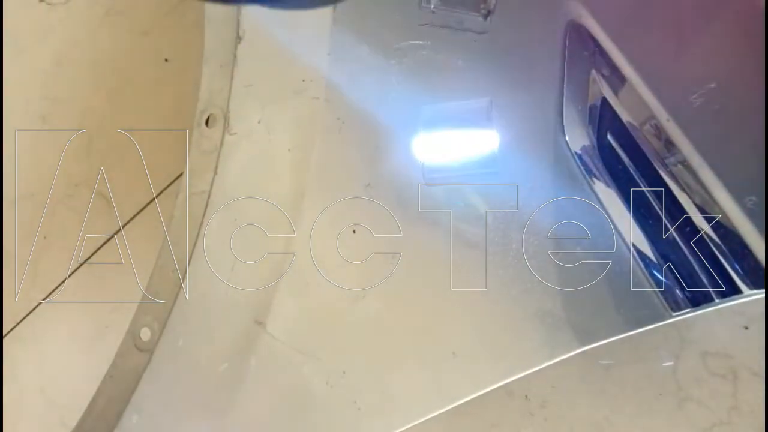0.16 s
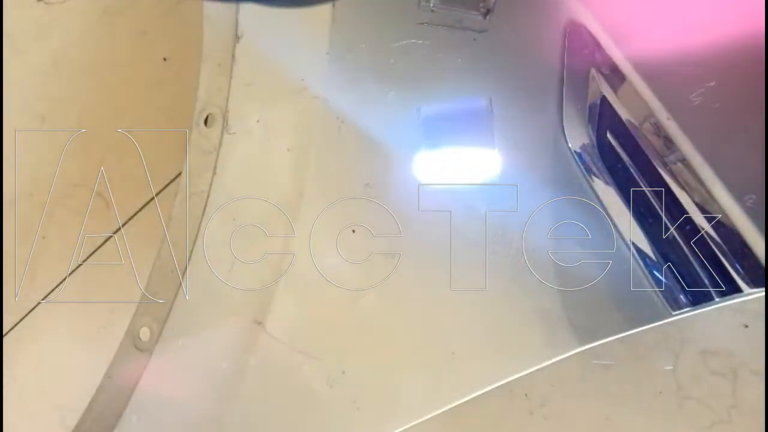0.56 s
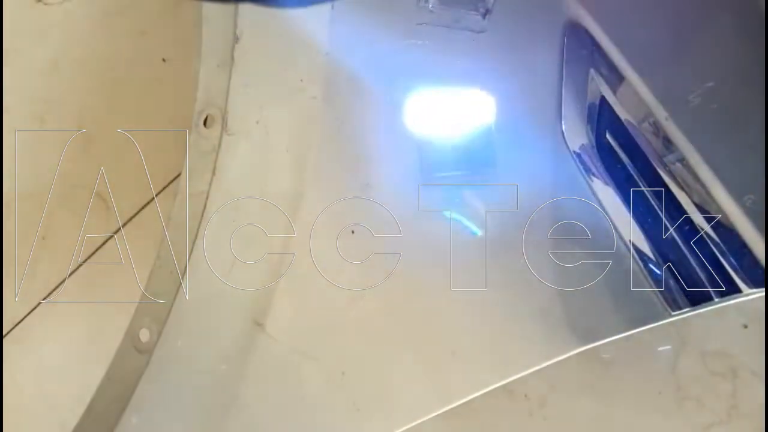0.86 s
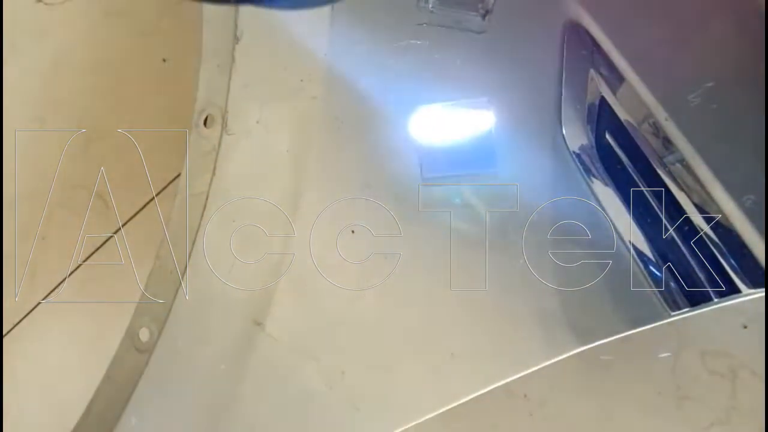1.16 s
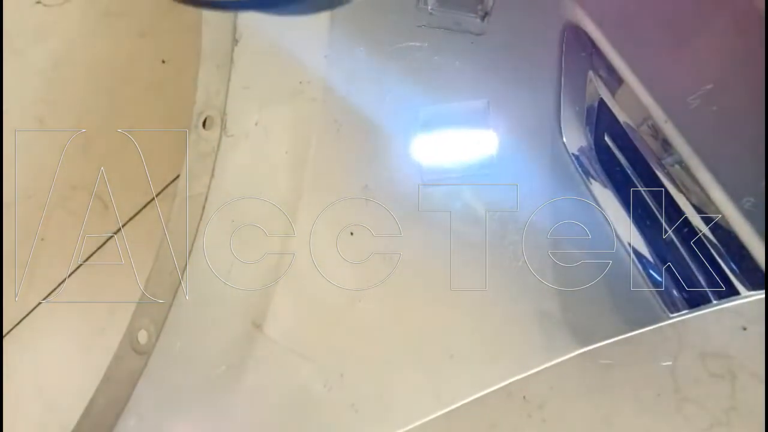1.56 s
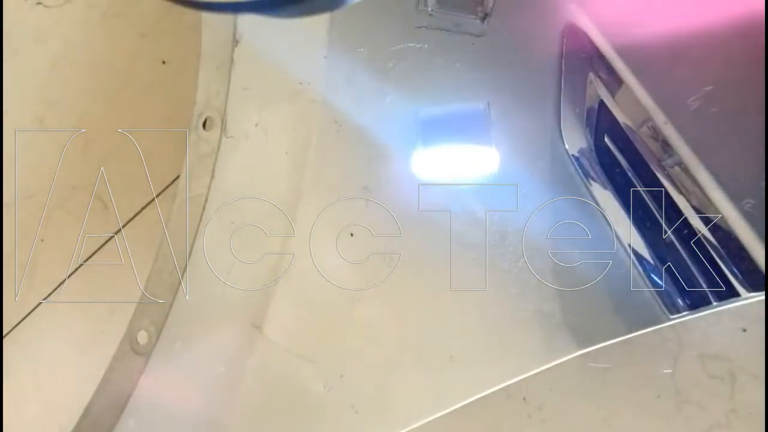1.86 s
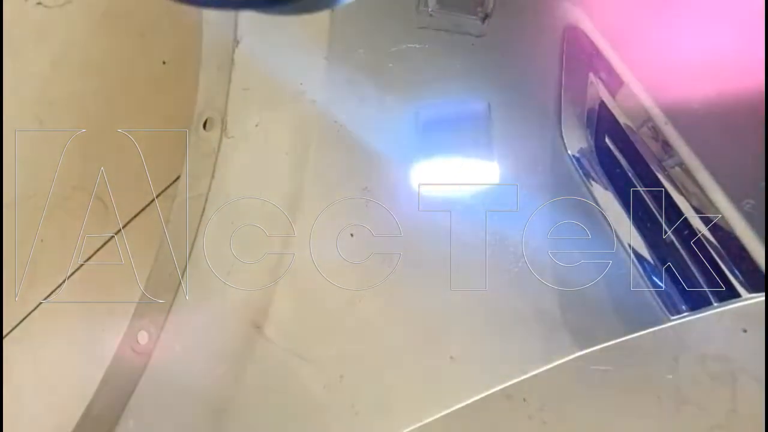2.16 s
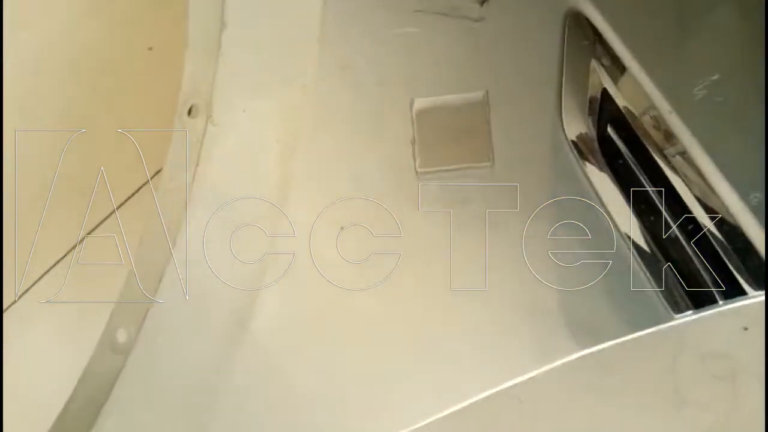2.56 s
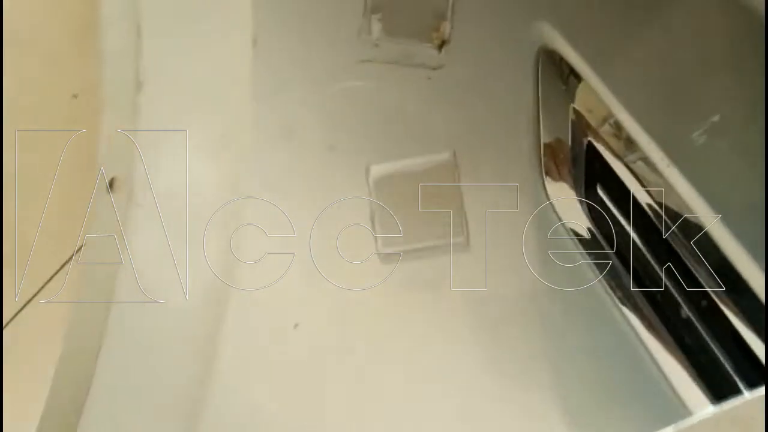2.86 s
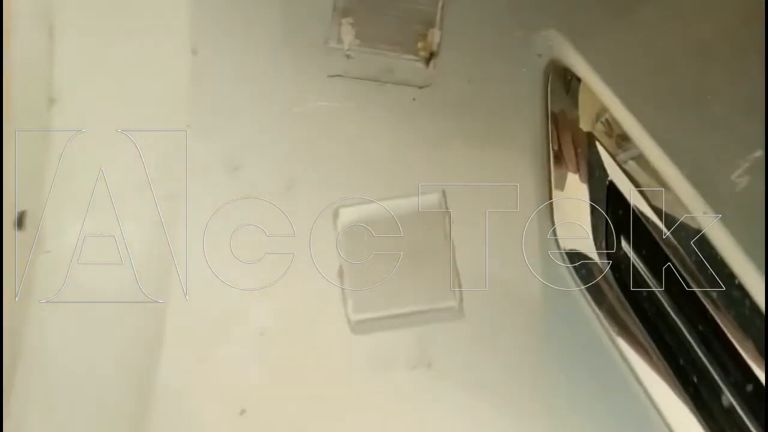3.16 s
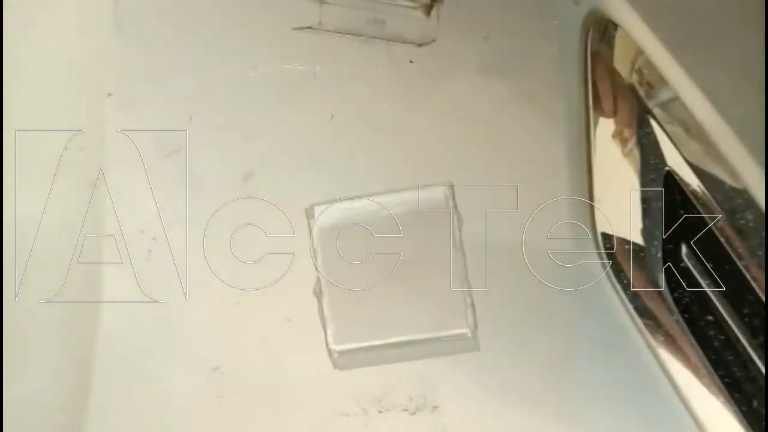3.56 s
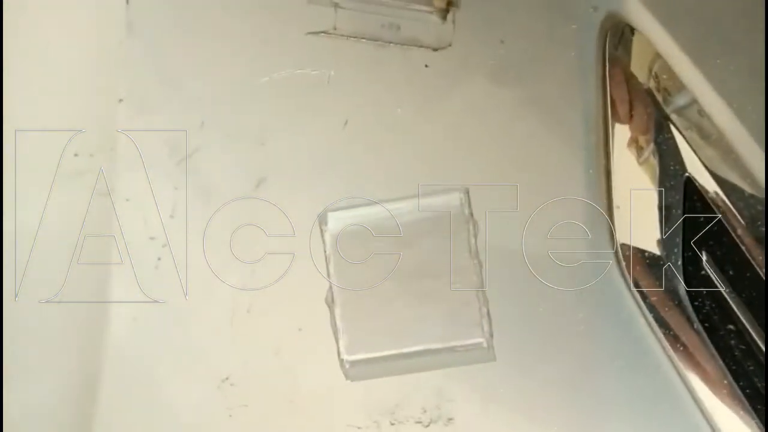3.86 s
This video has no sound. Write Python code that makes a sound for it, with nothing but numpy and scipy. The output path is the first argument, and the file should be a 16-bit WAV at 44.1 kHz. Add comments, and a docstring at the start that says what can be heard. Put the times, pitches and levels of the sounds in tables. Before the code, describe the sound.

A pulsed laser strips paint from sheet metal, heard close in stereo: a harsh, bright buzz of rapid pops, about 111 per second, with gritty sizzle and faint low hum. Its tone shifts unevenly, with two dull thuds near 0.22 s. At about 1.5 s it stops, and the workshop rings out briefly. Quiet fan rumble, hiss and thin whistles remain to 4 s, with a slight hiss swell and tick near 2.3 s.

```python
"""Pulsed laser stripping paint from sheet metal

A pulsed laser sweeps a line over painted sheet metal about 111 times a second, close to a phone.
Each turn of the beam radiates an impulsive pop; burnt paint sizzles as filtered noise in between.
A soft tone sounds at the sweep rate; two dull low thuds fall near where the pops shift by 1 ms.
When the beam stops, decaying noise lets the workshop ring out, leaving the shaped noise of fans:
rumble, thin hiss and narrow whistles, with one tick and a brief swell of hiss."""
import sys
import numpy as np
from scipy import signal
from scipy.fft import rfft, irfft
from scipy.io import wavfile
from scipy.ndimage import uniform_filter1d

SR = 44100
rng = np.random.default_rng(int(sys.argv[2]) if len(sys.argv) > 2 else 0)


def to_wav(s):
    """Save 16-bit WAV."""
    ch = np.atleast_2d(s).T  # columns
    pcm = np.round(np.clip(ch, -1, 1) * 32767)  # PCM
    wavfile.write(sys.argv[1], SR, pcm.astype(np.int16))


N = 176400
T = np.arange(N) / SR  # s
F = np.maximum(np.fft.rfftfreq(N, 1 / SR), 1)  # Hz
SWEEP_HZ = 111.05
STOP_S = 1.5334  # the beam stops


def undb(db):
    """Decibel law: amplitude ratio of a level in dB."""
    return 10 ** (np.asarray(db) / 20)


def unit(x):
    """Normalization to a root-mean-square value of 1."""
    return x / np.sqrt(np.mean(x ** 2))


def over_time(table, column):
    """Linear interpolation of one table column along time."""
    rows = np.array(table, float)
    return np.interp(T, rows[:, 0], rows[:, column])


def over_frequency(table, column):
    """Interpolation of one table column along logarithmic frequency."""
    rows = np.array(table, float)
    return np.interp(np.log(F), np.log(rows[:, 0]), rows[:, column])


def bands(x, edges_hz):
    """Complementary zero-phase filters: bands that add up to the whole sound."""
    lowpasses = [1 / (1 + (F / edge) ** 16) for edge in edges_hz]
    lowpasses = [0 * F] + lowpasses + [0 * F + 1]
    spectrum = rfft(x)
    return [irfft(spectrum * (upper - lower), N) for lower, upper in zip(lowpasses, lowpasses[1:])]


def delay(seconds):
    """Shift theorem: a delay is a phase proportional to frequency."""
    return np.exp(-2j * np.pi * F * seconds)


def causal(db):
    """Minimum-phase principle: folding the cepstrum of a gain curve in dB makes it causal."""
    log_gain = uniform_filter1d(db, size=N // 1000) * np.log(10) / 20
    cepstrum = irfft(log_gain, N)
    cepstrum[1:N // 2] *= 2
    cepstrum[N // 2 + 1:] = 0
    return np.exp(rfft(cepstrum))


def walk(rate_hz):
    """Slow random modulation: random levels held 1 / rate, slewed, at unit rms."""
    hold = int(SR / rate_hz)
    steps = np.repeat(rng.standard_normal(N // hold + 1), hold)
    return unit(uniform_filter1d(steps, hold)[:N])


def clicks(times, db):
    """Band-limited interpolation: windowed sinc impulses placed between samples."""
    at = np.asarray(times)[:, None] * SR
    taps = np.floor(at) + np.arange(-8, 9)
    offset = taps - at
    pulses = undb(db)[:, None] * np.sinc(offset) * np.cos(offset * np.pi / 18) ** 2
    out = np.zeros(N)
    np.add.at(out, np.clip(taps, 0, N - 1).astype(int), pulses)
    return out


# Spectrum of the fan noise: f/Hz, level/dB per Hz
FANS = [(20, 1), (60, -3), (81, -7), (293, -11.5), (500, -16.5), (1290, -19), (4670, -34.5), (8180, -33),
        (16000, -46.5)]
# Narrow whistling bands of the fans: f/Hz, Gaussian width/Hz, level over the hiss/dB
WHISTLES = [(58.74, 5, 4), (115, 38, 3), (529, 5.5, 5), (6915, 180, 11.5), (7980, 400, 8), (9680, 150, 9)]
# Fan level in time: t/s, rumble level/dB, middle level/dB (halved in the lower middle), treble level/dB
FAN_LEVEL = [(1.8, 2.5, 1, 5.5), (2.3, 3.5, 3, 3.5), (2.56, 4, 0.5, 0), (2.8, 0.5, -0.5, 2.5),
             (3.2, 2.5, -0.5, 2), (4, -1.5, -1.5, 1.5)]
FAN_SPLITS_HZ = (140, 2800, 6700)  # rumble, lower middle, upper middle, treble
FANS_DB = -56  # rms of the part common to both sides, before the levels in time
FANS_ALIKE_HZ = 700  # left and right are alike below this
RUMBLE_WAVER_DB = 1.5


def fans():
    """Broadband flow noise: wavering rumble, hiss and whistling bands as mid and side noise."""
    db = over_frequency(FANS, 1)
    for hz, width_hz, over_db in WHISTLES:
        db = db + over_db * np.exp(-.5 * ((F - hz) / width_hz) ** 2)
    mid, side = rfft(rng.standard_normal((2, N))) * undb(db)
    side = side * np.sqrt(0.11 + 0.5865 / (1 + (FANS_ALIKE_HZ / F) ** 2))
    scale = undb(FANS_DB) / np.std(irfft(mid, N))
    rumble_db = over_time(FAN_LEVEL, 1) + RUMBLE_WAVER_DB * walk(4.2)
    middle_db, treble_db = over_time(FAN_LEVEL, 2), over_time(FAN_LEVEL, 3)
    gains = undb([rumble_db, middle_db / 2, middle_db, treble_db])
    ears = []
    for sign in (1, -1):
        noise = irfft(mid + sign * side, N)
        ears.append(scale * np.sum(gains * bands(noise, FAN_SPLITS_HZ), axis=0))
    return np.array(ears)


# Spectrum of the swelling hiss: f/Hz, level/dB
SWELL = [(1000, 0), (3000, 2.5), (5000, -4), (8500, 3.5), (11000, -8)]
SWELL_S, SWELL_RISE_S, SWELL_FALL_S = 2.25, 0.13, 0.306  # peak time, Gaussian widths
SWELL_DB = -58  # rms at the peak


def swell():
    """Amplitude modulation: a faint wide hiss under an uneven Gaussian envelope."""
    spectrum = rfft(rng.standard_normal((2, N))) * undb(over_frequency(SWELL, 1)) * (F > 500)
    hiss = unit(irfft(spectrum, N))
    width_s = np.where(T < SWELL_S, SWELL_RISE_S, SWELL_FALL_S)
    return hiss * undb(SWELL_DB) * np.exp(-.5 * ((T - SWELL_S) / width_s) ** 2)


def tick():
    """Impulse excitation: one sharp click, high-passed at 3 kHz."""
    return bands(clicks([2.2865], [-35]), [3000])[1]  # time in s, click level in dB before the filter


HUM_DB, HUM_FADE_DB_PER_S = (-55, -46.5), -2.5  # rms at the start, left and right; fade


def hum():
    """Periodicity: the sweep rate is heard as a soft low sine while the beam is on."""
    on = uniform_filter1d(1. * (T < STOP_S), SR // 50)
    tone = np.sqrt(2) * np.sin(2 * np.pi * SWEEP_HZ * T)
    return undb(HUM_DB)[:, None] * tone * undb(HUM_FADE_DB_PER_S * T) * on


# Two dull low thuds about 9 ms apart, near where the pops shift by 1 ms:
# t/s, peak level before high-pass and panning/dB
THUDS = [(0.2169, -24), (0.2257, -26)]
THUD_WIDTH_S, THUD_PAN_DB = 0.00042, -19.5  # Gaussian width; left relative to right


def thuds():
    """Pressure pulses: short soft negative Gaussian pushes, high-passed at 70 Hz."""
    push = -sum(undb(db) * np.exp(-.5 * ((T - at) / THUD_WIDTH_S) ** 2) for at, db in THUDS)
    return bands(push, [70])[1] * undb([[THUD_PAN_DB / 2], [-THUD_PAN_DB / 2]])


FIRST_POP_S = .0069
OTHER_END = .5  # turn at the other end, as a fraction of the sweep period
SHIFT_AT_S, SHIFT_S = .217, .00102  # the pops come this much later from here on


def turns():
    """Periodic excitation: times of the beam's turns, alternately at the main and the other end."""
    turn = np.arange(int(2 * SWEEP_HZ * N / SR))
    times = FIRST_POP_S + (turn // 2 + OTHER_END * (turn % 2)) / SWEEP_HZ
    times = times + SHIFT_S * (times > SHIFT_AT_S)
    return times[times < STOP_S]


# Beam sound in time: t/s, then level/dB of the thud, low, middle and treble of the pop
# at the main end, of the whole pop at the other end, and of the sizzle
BEAM = [(0, 0.5, 0.5, 3, -8.5, -21, 3), (.11, -4.5, -7.5, 1.5, -3.5, -3.5, 2.5),
        (.16, 8, -5, -9.5, -1.5, -1, 8), (.2, 12, 2, -8, -3.5, 2.5, 1.5), (.222, 14, -2, -15, -27, -7.5, 8),
        (.26, 4, -10, 0.5, -4, -2, 2), (.33, 1, -2.5, -4, -3, -5, 4), (.42, 3.5, -0.5, 1.5, -6, -7, 4.5),
        (.51, -24.5, -2.5, -0.5, 1.5, -50.5, 2.5), (.6, 4, 3.5, -1.5, -3.5, -70, 2),
        (.69, 5.5, 7.5, -6.5, 3, -15, 1.5), (.78, 3, 5, -1.5, -4, -55, 5.5),
        (.85, -8.5, -8, 2, -4.5, -49, 2), (.95, 3.5, -6, 0, -4, -14, 1.5),
        (1.0, -36.5, -6, -6, -5, -8.5, 0), (1.04, -4, -3, 6, -7.5, -38, 0), (1.27, -12, -4, 2, 0, -30, 2),
        (1.41, -6.5, 0, 4, -6, -22, 1.5), (1.5, 6, 3, 1, -4, -34, 3), (1.53, 11.5, -5, -7, -8, 8.5, 5.5)]
# Spectral tilt of the sizzle: f/Hz, level against the pops/dB
SIZZLE_TILT = [(100, 11.5), (650, -1.5), (2300, 2.5), (3400, 1.5), (4500, 7), (5700, 2.5), (6800, 3),
               (9100, 5), (10500, 6)]
SIZZLE_REPEAT = 0.31
SIZZLE_ALIKE, SIZZLE_ALIKE_HZ = 0.76, 5100  # likeness of left and right in the bass; where it halves
SIZZLE_GRAIN_DB, SIZZLE_FLICKER_DB, SIZZLE_SHIFT_DB = 1.5, 1., 2  # unevenness, level and colour shifts
SIZZLE_BANDS_HZ = 700 * 2 ** (np.arange(14) / 3)  # third octaves
FLARE_DB, FLARE_S, FLARE_LAG_S = 4.5, .0004, 0.0009  # flare by each main pop: height, width, lag


def sizzle():
    """Comb-filtered noise: dense uneven sparks, partly repeating each sweep, of shifting colour."""
    grain = undb(SIZZLE_GRAIN_DB * rng.exponential(size=(3, N)))
    both, left, right = rfft(rng.standard_normal((3, N)) * grain)
    alike = SIZZLE_ALIKE / (1 + (F / SIZZLE_ALIKE_HZ) ** 2)
    sparks = np.sqrt(alike) * both + np.sqrt(1 - alike) * np.array([left, right])
    comb = 1 / (1 - SIZZLE_REPEAT * delay(1 / SWEEP_HZ))
    sparks = unit(irfft(sparks * comb * undb(over_frequency(SIZZLE_TILT, 1)), N))
    sparks = sum(band * undb(SIZZLE_SHIFT_DB * walk(16)) for band in bands(sparks, SIZZLE_BANDS_HZ))
    flares = turns()[::2] + FLARE_LAG_S
    nearest = np.clip(np.searchsorted(flares - .5 / SWEEP_HZ, T) - 1, 0, None)
    flare_db = FLARE_DB * np.exp(-.5 * ((T - flares[nearest]) / FLARE_S) ** 2)
    level_db = over_time(BEAM, 6) + flare_db + SIZZLE_FLICKER_DB * walk(24.42)
    return sparks * undb(level_db) * (T < STOP_S)


SPLITS_HZ = (330, 1500, 4000)  # thud, low, middle, treble
POP_JITTER_S = (.0001, .0001, .000015, .00002)  # thud, low, middle, treble
POP_SCATTER_DB, POP_WANDER_S = 1.6, .000035
LOW_LEAD_S = 0.00038  # thud and low part of the main pop come this much earlier
OTHER_END_DB = (6.5, 6, 0)  # low, middle, treble at the other end, which has no panel near it


def pops():
    """Impulse train: a pop at both ends of a sweep, its balance shifting as the paint comes off."""
    times = turns()
    chance = rng.standard_normal((8, len(times)))
    times = times + POP_WANDER_S * np.interp(times, T, walk(15))
    main = other = 0
    for k, jitter_s in enumerate(POP_JITTER_S):
        at = times + jitter_s * chance[k]
        db = POP_SCATTER_DB * chance[4 + k]
        lead_s = LOW_LEAD_S if k < 2 else 0
        main_clicks = clicks(at[::2] - lead_s, db[::2])
        main = main + undb(over_time(BEAM, k + 1)) * bands(main_clicks, SPLITS_HZ)[k]
        if k:  # only the main end thuds
            other_clicks = clicks(at[1::2], db[1::2])
            other_db = OTHER_END_DB[k - 1] + over_time(BEAM, 5)
            other = other + undb(other_db) * bands(other_clicks, SPLITS_HZ)[k]
    return np.sqrt(SR / SWEEP_HZ) * np.array([main, other])


# Decay of the workshop: f/Hz, reverberation time/s
ROOM_T60 = [(100, 0.35), (500, 1), (2000, 0.62), (6000, 0.54), (12000, 0.39)]


def room():
    """Exponential decay: two noise tails that lose 60 dB in each band's reverberation time."""
    hz, t60_s = np.array(ROOM_T60).T
    edges_hz = np.sqrt(hz[1:] * hz[:-1])
    tails = []
    for _ in range(2):
        tail = 0
        for band, decay_s in zip(bands(rng.standard_normal(N), edges_hz), t60_s):
            equal_energy = np.sqrt(2 * np.log(1000) / decay_s / SR)
            tail = tail + band * undb(-60 * T / decay_s) * equal_energy
        tails.append(tail)
    return rfft(tails)


# Resonances of sheet, hull and microphone ports: f/Hz, left level/dB, right level/dB
COLOUR = [(51.7, -28, -39), (125, -27.5, -20), (268, -25.5, -18.5), (646.6, -8, -10), (900, -10.5, -7.5),
          (1200, -9, -10), (1620, -10.5, -10.5), (2061, -7.5, -2), (2463, -3, -0.5), (2747, -15.5, -6),
          (2686, 2.5, -3.5), (2940, -8, -7), (3320, -1.5, -5), (3674, -6.5, -6), (3950, -11.5, -11),
          (4230, -11, -9), (5260, -7.5, -14.5), (6830, -3.5, -11), (7617, 2, -8.5), (8300, -3.5, -10),
          (9010, -10.5, 1), (9210, -12.5, -6), (11200, -15, -15), (16000, -14.5, -13.5)]
# Reflections of a main pop off nearby panels: delay t/s, left level/dB, right level/dB
ECHOES = [(.00044, 7, 6), (.00225, -9, -27)]
ECHO_DULL_HZ = 8980
RIGHT_LAG_S = .0001
COLOUR_DB = 6.0  # added to the colour on both sides
POP_DB, SIZZLE_DB = -27, -22  # before the colour
POP_ROOM_DB, ROOM_DB = -10.5, -8.5  # workshop tail of the pops and of the sizzle


def laser():
    """Source and filter: pops with reflections and sizzle, convolved with room tail and colour."""
    dull = 1 / np.sqrt(1 + (F / ECHO_DULL_HZ) ** 4)
    echoes = np.array([1 + dull * sum(undb(echo[side]) * delay(echo[0]) for echo in ECHOES)
                       for side in (1, 2)])
    left = causal(over_frequency(COLOUR, 1))
    right = causal(over_frequency(COLOUR, 2)) * delay(RIGHT_LAG_S)
    colour = np.array([left, right]) * undb(COLOUR_DB)
    tails = room()
    main, other = rfft(undb(POP_DB) * pops())
    pop = main * echoes + other * delay(ECHOES[0][0])
    pop = pop * (1 + undb(POP_ROOM_DB) * tails)
    hiss = rfft(undb(SIZZLE_DB) * sizzle()) * (1 + undb(ROOM_DB) * tails)
    return irfft(colour * (pop + hiss), N)


def scene():
    """Superposition: the pressures of all sources add."""
    return fans() + swell() + tick() + hum() + thuds() + laser()


def record(dry):
    """Saturation and band limiting: loud peaks are rounded softly; nothing sounds above about 15.7 kHz."""
    soft = np.tanh(dry)
    lowpass = signal.ellip(14, .2, 95, 15720, fs=SR, output="sos")  # ripple and stopband in dB, edge in Hz
    return signal.sosfilt(lowpass, soft)


dry = scene()
out = record(dry)
to_wav(out)
```